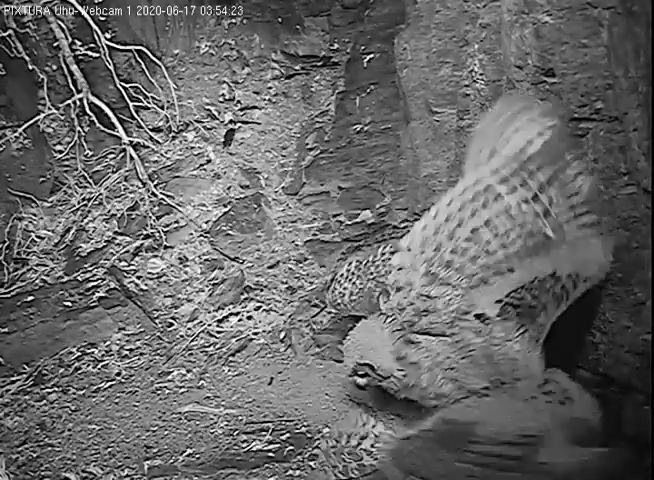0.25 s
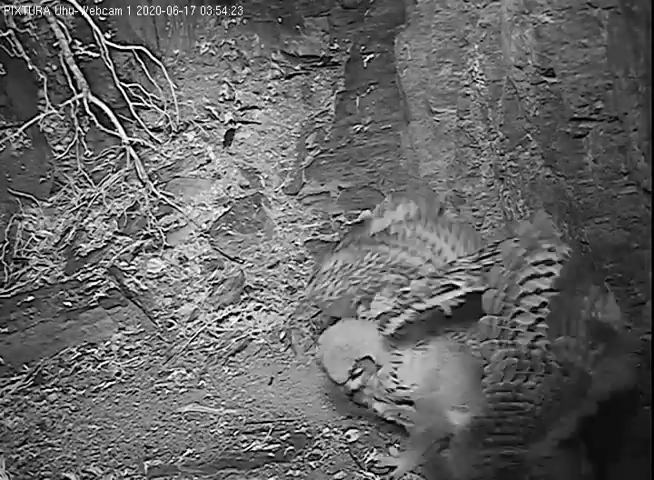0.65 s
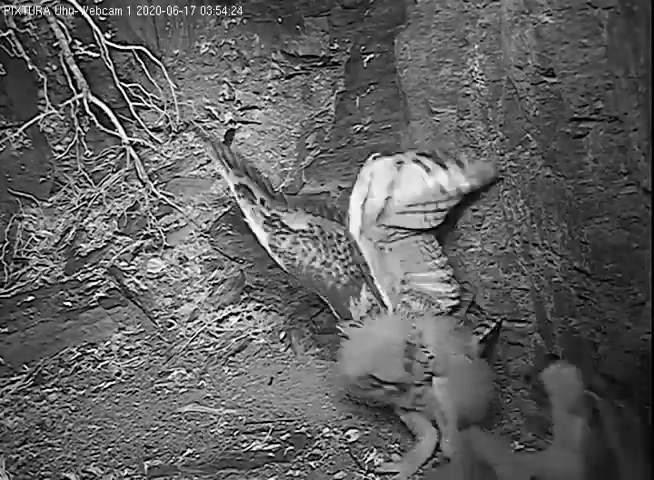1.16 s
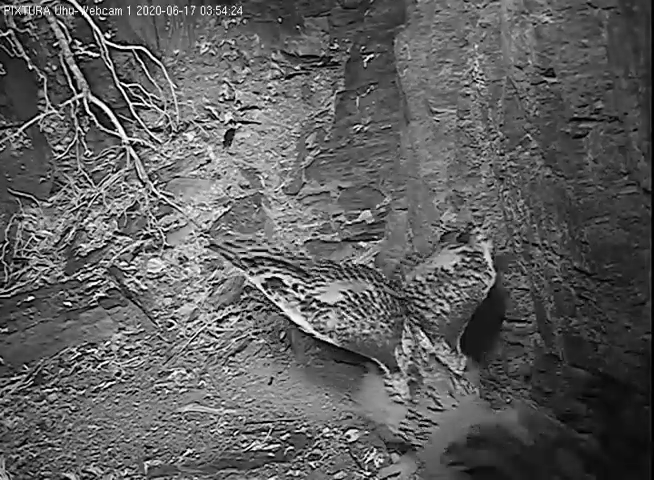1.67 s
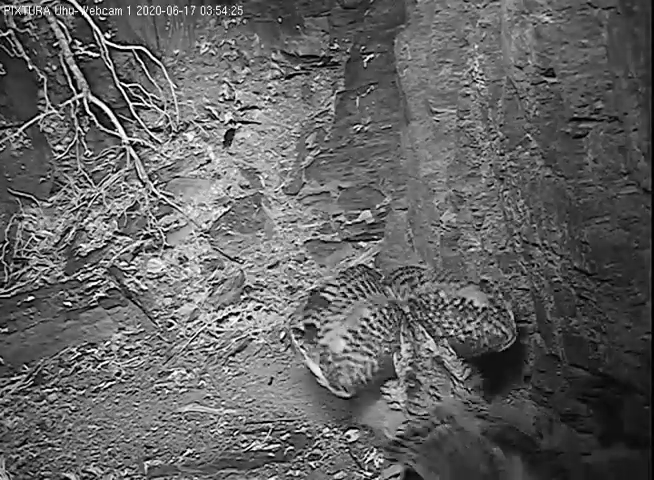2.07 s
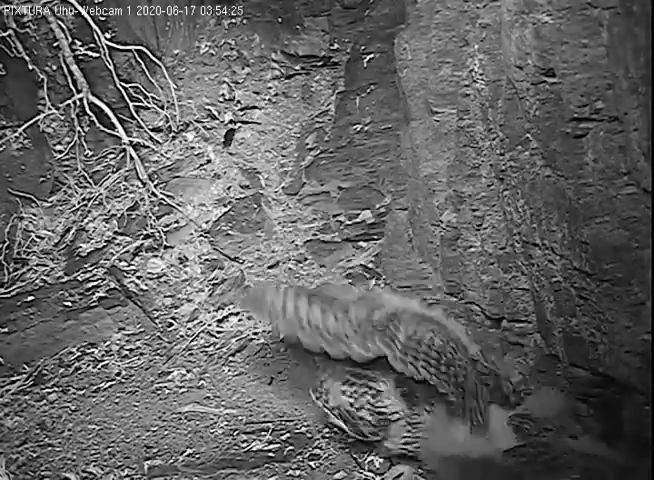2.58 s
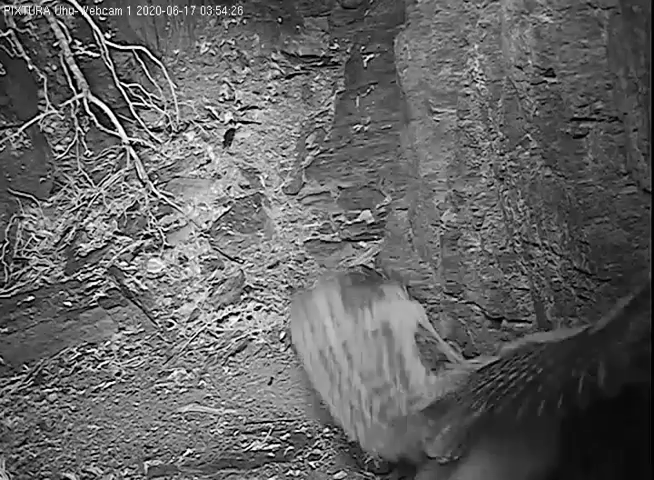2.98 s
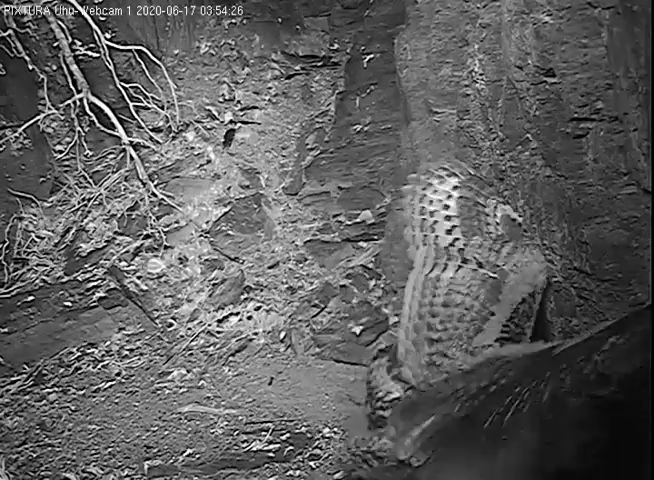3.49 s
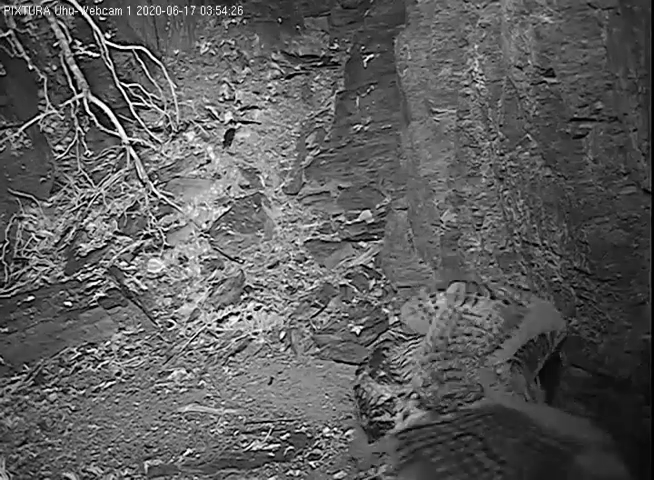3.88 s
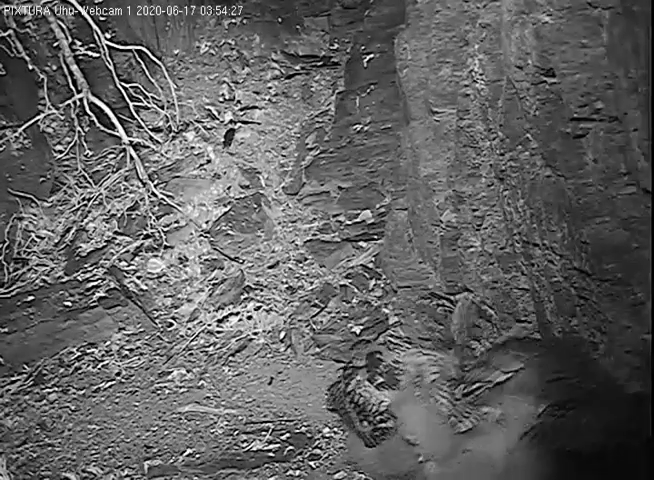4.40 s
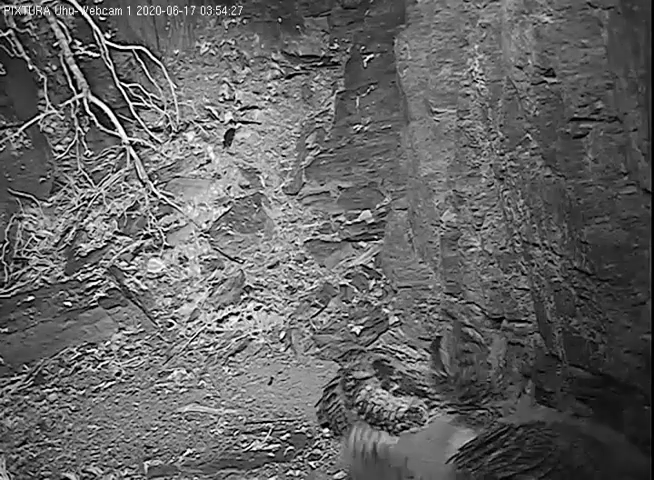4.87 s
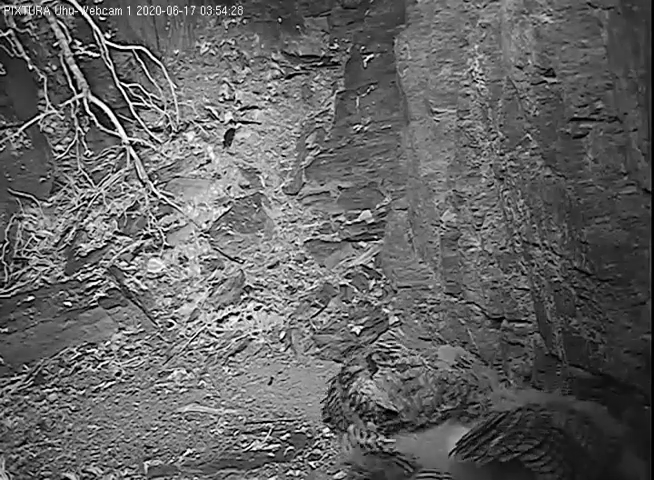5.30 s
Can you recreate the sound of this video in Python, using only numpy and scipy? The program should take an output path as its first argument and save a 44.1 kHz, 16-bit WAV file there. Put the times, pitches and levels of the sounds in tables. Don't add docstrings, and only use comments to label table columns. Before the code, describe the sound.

A young owl in a rocky nest gives thin whistles and rasping begging screeches over low rumble, after wing scuffs and one hollow knock.

```python
import sys
import numpy as np
from scipy import signal
from scipy.fft import rfft, irfft
from scipy.io import wavfile
from scipy.ndimage import uniform_filter1d

SR = 44100
rng = np.random.default_rng(int(sys.argv[2]) if len(sys.argv) > 2 else 0)


def to_linear_factor(level_db):
    exponent = np.asarray(level_db, float) / 20
    return 10 ** exponent


def to_wav(sig):
    pcm = np.clip(np.atleast_2d(sig), -1, 1) * 32767
    pcm = np.round(pcm).astype(np.int16)
    wavfile.write(sys.argv[1], SR, pcm.T)


N = 244314

# t/s, rumble level/dB, rustle level/dB
NIGHT_LEVELS = [(0.0, -42.5, -52.5), (0.12, -42, -55.5), (0.65, -41.5, -53.5), (1.5, -42, -60),
                (2.52, -39, -57), (2.75, -35.5, -58.5), (2.85, -40, -59.5), (3.02, -38, -59),
                (3.1, -43, -57), (3.35, -37.5, -58.5), (3.58, -41.5, -60.5), (3.66, -36, -58),
                (3.96, -38.5, -56), (4.1, -34.5, -53.5), (4.32, -40, -58), (4.41, -35, -57.5),
                (4.52, -39.5, -58), (4.88, -37.5, -57), (5.25, -41, -53.5), (5.54, -39.5, -56)]
# f/Hz, level/dB
RUMBLE_SPECTRUM = [(12, -39), (20, -22.5), (48, -1), (79, 4), (118, -3), (161, -1.5), (192, -6.5),
                   (226, -20), (278, -16), (320, -21.5), (420, -39), (700, -120)]
RUSTLE_SPECTRUM = [(120, -28.5), (200, -3), (227, -12), (264, -15), (430, -8), (475, -10), (525, -14.5),
                   (765, -17.5), (1010, -29.5), (1560, -24), (2060, -32.5), (2390, -25), (4000, -43),
                   (5200, -65.5), (8800, -120)]
HISS_SPECTRUM = [(530, -30), (900, -2.5), (1190, -6.5), (1560, -15.5), (1890, -6), (2460, -19.5),
                 (2890, -12), (3810, -13.5), (4230, -14.5), (6870, -14.5), (8710, -31.5), (11300, -58),
                 (19200, -120)]
# t/s, level/dB, centre f/Hz, width/octaves, t60/s
LITTER_SCUFFS = [(.276, -38, 425, 0.33, .05), (.278, -48.5, 2500, 0.62, 0.034),
                 (.308, -39, 250, 0.47, 0.055), (.317, -41, 1560, 0.42, .07),
                 (.385, -50.5, 1500, 0.98, 0.15), (.415, -47, 1390, 0.55, 0.088),
                 (.607, -42.5, 2670, 0.83, .12), (.609, -46, 470, 0.21, 0.091),
                 (.832, -45.5, 500, 1.2, 0.056), (.846, -52, 3520, 0.69, .1),
                 (1.075, -48.5, 4950, 0.4, 0.072), (1.098, -50, 1200, .9, 0.043),
                 (2.209, -49, 594, .8, 0.094), (2.750, -46, 440, 0.51, 0.11),
                 (2.787, -41.5, 336, 1.18, 0.14), (2.856, -54, 500, 0.37, 0.041),
                 (3.286, -39, 567, 0.72, 0.067), (4.005, -53, 600, .8, .08), (4.170, -51, 500, 0.88, 0.23),
                 (5.340, -48, 810, 1.1, 0.24)]
# t/s, level/dB, contact/ms
KNOCK_BLOWS = [
    (0.489, -20.5, .9),
    (0.49, -20.5, 0.22),
    (.4940, -25, 0.15),
    (.4975, -23, 0.24),
]
# f/Hz, level/dB, t60/s
BODY_MODES = [(414, -24, .03), (530, -1, 0.045), (657, 5.5, 0.031), (790, -19, 0.017), (950, -7, 0.045),
              (1176, -1.5, 0.058), (1480, 8.5, 0.045), (1550, -7, 0.054), (2000, 2, 0.033),
              (2500, -31, 0.023)]
# t/s, length/s, start f/Hz, end f/Hz, level/dB, octave level/dB
WHISTLE_GLIDES = [(0.529, 0.017, 5250, 5250, -58.5, -30), (0.622, 0.026, 5300, 5330, -55, -30),
                  (0.647, 0.022, 2450, 2500, -53, -25), (0.677, .015, 2560, 2760, -54, -21),
                  (0.871, .03, 2450, 2380, -59, -14), (0.914, 0.018, 1536, 1550, -53.5, -15),
                  (1.016, 0.012, 5200, 5200, -57, -30), (1.15, 0.033, 2262, 2234, -40.5, -25),
                  (1.194, 0.019, 2350, 2910, -39, -15.5), (1.274, .016, 2300, 2220, -48, -24),
                  (1.305, 0.012, 2320, 2500, -46.5, -12), (1.693, 0.017, 2130, 2760, -43.5, -15),
                  (1.702, 0.07, 3086, 3100, -44.5, -28), (1.753, 0.021, 3300, 2430, -34.5, -33),
                  (1.782, 0.016, 2390, 3300, -40, -17), (1.859, 0.013, 3700, 2710, -31, -27),
                  (1.88, 0.019, 2690, 3530, -40.5, -18), (1.942, 0.01, 3800, 3170, -32.5, -25),
                  (2.008, 0.01, 2870, 2970, -43, -20), (1.925, .014, 3100, 3180, -50, -15),
                  (2.106, 0.011, 3880, 3830, -47, -20), (2.133, 0.0097, 2580, 2950, -32, -29),
                  (2.192, .014, 4770, 4700, -47, -20), (2.318, 0.023, 4200, 4360, -48, -18),
                  (2.905, 0.013, 4430, 4740, -34.5, -24), (2.009, 0.029, 4200, 4130, -42, -38),
                  (2.161, 0.027, 2700, 2900, -51, -16), (2.274, 0.011, 4200, 4170, -46.5, -25),
                  (2.486, .018, 3800, 3756, -33, -25), (2.506, .03, 3860, 3800, -51, -32),
                  (2.484, .055, 5130, 4850, -44, -30), (2.579, 0.016, 5130, 5400, -46, -30),
                  (2.597, 0.039, 5200, 4820, -42, -30), (2.672, 0.022, 5200, 6000, -48.5, -35),
                  (2.689, 0.048, 5440, 4500, -42.5, -35), (2.723, 0.018, 1500, 1480, -43.5, -28),
                  (2.765, 0.029, 3950, 5430, -43.5, -30), (2.794, 0.039, 4860, 4560, -44, -25),
                  (2.876, 0.017, 4830, 4290, -24.5, -30), (3.500, .012, 2070, 2640, -39.5, -25),
                  (3.51, 0.062, 3230, 3110, -53, -10), (3.551, 0.026, 3010, 2920, -39, -10.5),
                  (3.571, 0.026, 2850, 2230, -38.5, -24), (3.613, 0.032, 2500, 3140, -41.5, -21),
                  (3.643, 0.032, 2730, 2660, -45, -21), (3.664, 0.039, 2630, 2336, -39.5, -18.5),
                  (3.723, 0.018, 3075, 3350, -43, -24), (3.764, 0.025, 3310, 2626, -34.5, -15),
                  (3.804, 0.03, 2210, 2190, -49, -11), (3.828, 0.015, 3210, 3360, -45.5, -22),
                  (3.858, 0.018, 3364, 3020, -35.5, -29), (3.945, 0.042, 3310, 2530, -38.5, -22),
                  (4.05, 0.0224, 3250, 2400, -40, -22), (4.096, 0.025, 2920, 3340, -40, -26),
                  (4.13, 0.033, 3270, 2350, -39, -27), (4.496, .014, 2000, 2320, -56, -20),
                  (4.514, 0.032, 2500, 2280, -51.5, -17), (4.548, .02, 2090, 2040, -53, -22),
                  (4.582, .035, 1920, 1920, -57.5, -21), (4.624, 0.03, 2070, 1980, -53, -16),
                  (4.670, 0.043, 1930, 1770, -54.5, -20), (4.73, .045, 2050, 2193, -55, -9.5),
                  (4.784, .02, 2160, 2980, -44, -10), (4.805, 0.014, 2950, 2920, -48, -12),
                  (4.818, 0.034, 2863, 2620, -38, -18.5), (4.839, 0.028, 2765, 2220, -41, -16),
                  (4.878, 0.026, 2230, 2900, -41.5, -11.5), (4.887, 0.064, 3230, 3244, -41.5, -22),
                  (4.894, 0.073, 2780, 2996, -37.5, -19.5), (4.963, 0.012, 2800, 3400, -35.5, -20),
                  (5.016, 0.032, 3285, 2750, -34, -17), (5.110, 0.016, 3540, 2520, -36.5, -15),
                  (5.14, 0.021, 2660, 3510, -39.5, -19), (5.19, 0.036, 3315, 2600, -32.5, -18),
                  (5.238, 0.052, 3290, 3190, -45.5, -15), (5.287, 0.019, 3370, 2610, -33, -17.5)]
# t/s, f/Hz, level/dB
ARCHED_WHISTLE = [
    (1.485, 2389, -73),
    (1.515, 2786, -47),
    (1.567, 3228, -50.5),
    (1.665, 2750, -50.5),
    (1.673, 2771, -75),
    (1.685, 2352, -71),
]
# t/s, level/dB
BEAK_AIR = [
    [(1.68, -84), (1.696, -70), (2.036, -55), (2.188, -70), (2.196, -51), (2.24, -63), (2.328, -58),
     (2.352, -83), (2.368, -54), (2.802, -49.5), (2.826, -36), (2.862, -71), (2.882, -38), (2.942, -63),
     (2.962, -40), (3.018, -66), (3.07, -41), (3.12, -74)],
    [(3.45, -81), (3.58, -66), (3.766, -70), (3.786, -56), (3.866, -65), (3.904, -57), (3.94, -63),
     (3.99, -60), (4.026, -73), (4.194, -65), (4.25, -84)],
    [(4.72, -82), (4.728, -79), (4.8, -62), (4.81, -71), (4.842, -59), (4.862, -67), (5.07, -55),
     (5.076, -57), (5.304, -54), (5.362, -54), (5.42, -83)],
]
# t/s, length/s, start f/Hz, dip f/Hz, end f/Hz, level/dB
RASP_DIPS = [(1.707, .1, 3000, 2855, 3080, -51), (1.85, .055, 3680, 2500, 3440, -44),
             (1.94, .05, 3900, 2630, 3100, -41.5), (2.021, 0.049, 3900, 2500, 3200, -39.5),
             (2.104, 0.046, 3890, 2585, 3800, -39.5), (2.197, 0.045, 3800, 2500, 3100, -34.5),
             (2.282, .05, 3900, 2624, 3150, -35), (2.364, 0.066, 4140, 2880, 4120, -38),
             (2.446, .055, 3900, 2900, 3800, -40), (2.53, .065, 3800, 3000, 3640, -36.5),
             (2.622, .055, 4500, 3115, 4200, -37.5), (2.7, .065, 4300, 3530, 3980, -41.5),
             (2.787, .055, 4200, 3650, 4470, -37), (2.867, 0.064, 4800, 3610, 4400, -41.5),
             (2.953, .05, 4400, 2350, 3400, -34), (3.037, 0.052, 3700, 2680, 2450, -31.5),
             (3.043, 0.061, 1750, 1578, 1100, -40.5), (3.457, 0.079, 2300, 1777, 2580, -48),
             (3.564, 0.098, 3000, 2500, 3060, -50), (3.696, 0.049, 2690, 2400, 3200, -43),
             (3.784, 0.061, 2850, 2432, 3220, -42), (3.868, 0.058, 3220, 2500, 2780, -42.5),
             (3.975, .045, 2753, 2460, 3160, -40.5), (4.059, 0.0447, 2940, 2235, 2920, -44),
             (4.154, 0.073, 2910, 2190, 2300, -43.5), (4.792, 0.025, 2710, 2860, 2940, -47.5),
             (4.942, 0.029, 2880, 2390, 3010, -43.5), (4.98, .032, 3090, 3000, 3040, -45),
             (5.027, 0.052, 2920, 2320, 3440, -42), (5.118, 0.032, 2820, 2380, 3130, -45),
             (5.221, 0.0387, 2770, 2280, 3030, -44.5), (5.305, 0.041, 2890, 2500, 2800, -40.5),
             (5.325, 0.066, 3000, 2610, 2500, -35.5)]
# f/Hz, level/dB
RASP_AIR_SPECTRUM = [(900, -6), (1500, 7), (2500, 4.5), (4000, 7.5), (5200, 6.5), (6000, -8.5),
                     (7500, -5.5), (9000, -37)]
# f/Hz, width/Hz, gain/dB
THROAT_RESONANCES = [(2450, 86, 5), (3250, 330, 5), (3800, 470, 5.5), (4200, 67, 3.5), (5200, 190, 1)]
# delay/s, level/dB
ROCK_ECHOES = [
    (.0031, -14),
    (.0057, -13),
    (.0094, -15),
    (0.0139, -15.5),
]


def evened(x):
    return x / np.sqrt(np.mean(x ** 2) + 1e-20)


def read(points, hz):
    f, level_db = np.transpose(points)
    return np.interp(np.log(hz + 1), np.log(f + 1), level_db, -90, -90)


def colour(x, shape_db):
    hz = np.fft.rfftfreq(len(x), 1 / SR)
    return irfft(rfft(x) * to_linear_factor(shape_db(hz)), len(x))


def bell_db(hz, centre_hz, octaves):
    return -6 * (np.log2((hz + 1) / centre_hz) / octaves) ** 2


def drift(size, hz):
    return evened(colour(rng.standard_normal(size), lambda f: -20 * (f / hz) ** 2))


def add(mix, s, sound):
    part = mix[round(s * SR):][:len(sound)]
    part += sound[:len(part)]


def night():
    s, rumble_db, rustle_db = np.transpose(NIGHT_LEVELS)
    t = np.arange(N) / SR
    low, grains, smooth = rng.standard_normal((3, N))
    grains = grains * to_linear_factor(1.3 * drift(N, 25))
    rumble = evened(colour(low, lambda f: read(RUMBLE_SPECTRUM, f)))
    rustle = evened(colour(grains, lambda f: read(RUSTLE_SPECTRUM, f)))
    hiss = evened(colour(smooth, lambda f: read(HISS_SPECTRUM, f)))
    out = to_linear_factor(np.interp(t, s, rumble_db)) * rumble
    out += to_linear_factor(np.interp(t, s, rustle_db) + 3.5) * rustle
    return out + to_linear_factor(-62) * hiss


def scuffs():
    size, rise_s = 8192, 0.0016
    out, t = np.zeros(N), np.arange(size) / SR
    for s, db, centre_hz, octaves, t60_s in LITTER_SCUFFS:
        noise, grit = rng.standard_normal((2, size))
        burst = noise * to_linear_factor(1.0 * evened(uniform_filter1d(grit, 60)))
        burst = evened(colour(burst, lambda f: bell_db(f, centre_hz, octaves)))
        add(out, s, to_linear_factor(db - 60 * t / t60_s) * burst * np.minimum(t / rise_s, 1))
    return out


def knock():
    out, t = np.zeros(N), np.arange(4096) / SR
    ring = np.zeros(len(t))
    for hz, db, t60_s in BODY_MODES:
        ring -= to_linear_factor(db - 60 * t / t60_s) * np.sin(2 * np.pi * hz * t)
    for s, db, contact_ms in KNOCK_BLOWS:
        contact = np.hanning(round(contact_ms * SR / 1000) + 3)
        blow = np.convolve(ring, contact)
        add(out, s, to_linear_factor(db) * blow / abs(blow).max())
    return out


def tone(hz, octave_db):
    phase = 2 * np.pi * np.cumsum(hz) / SR
    throat_loss_db = 24 * np.maximum(hz / 2800 - 1, 0) / 0.23
    return np.sqrt(2) * (np.sin(phase) + to_linear_factor(octave_db - throat_loss_db) * np.sin(2 * phase))


def whistles():
    out = np.zeros(N)
    waver, flutter, hoarse = drift(N, 270), drift(N, 82), drift(N, 780)
    for s, length_s, start_hz, end_hz, db, octave_db in WHISTLE_GLIDES:
        n, at = round(length_s * SR), round(s * SR)
        hz = np.linspace(start_hz, end_hz, n) * (1 + .009 * waver[at:at + n])
        add(out, s, to_linear_factor(db) * tone(hz, octave_db) * signal.windows.tukey(n, .55))
    s, hz, db = np.transpose(ARCHED_WHISTLE)
    t = np.arange(s[0], s[-1], 1 / SR)
    arch = tone(np.interp(t, s, hz), -28) * signal.windows.tukey(len(t), .1)
    add(out, s[0], to_linear_factor(np.interp(t, s, db)) * arch)
    return out * to_linear_factor(1.5 * flutter) * (1 + .25 * hoarse)


def beak():
    t, level = np.arange(N) / SR, np.zeros(N)
    for phrase in BEAK_AIR:
        s, db = np.transpose(phrase)
        level += to_linear_factor(np.interp(t, s, db, -120, -120) - 2.5)

    def resonances_db(f):
        upper = -6 * ((f - 5200) / 550) ** 2
        lower = -1.5 - 6 * ((f - 3050) / 450) ** 2
        return np.maximum(upper, lower)

    air = evened(colour(rng.standard_normal(N), resonances_db))
    return level * air * to_linear_factor(1.9 * drift(N, 60))


def rasps():
    out = np.zeros(N)
    jump, sputter = np.tanh(drift(N, 700)), np.tanh(drift(N, 220))
    air = evened(colour(rng.standard_normal(N), lambda f: read(RASP_AIR_SPECTRUM, f)))
    fizz = evened(colour(rng.standard_normal(N), lambda f: bell_db(f, 6800, 0.18)))
    for s, length_s, start_hz, dip_hz, end_hz, db in RASP_DIPS:
        n, at = round(length_s * SR), round(s * SR)
        here = slice(at, at + n)
        u = np.linspace(0, 1, n)
        chaos = .07 + .12 * np.sin(np.pi * u) ** 2
        hz = np.interp(u, [0, .3, .6, 1], [start_hz, dip_hz, 1.05 * dip_hz, end_hz])
        hz = hz * (1 + chaos * jump[here])
        fizz_db = -26 + 14 * (start_hz / 4000 - 1) / 0.16
        voice = tone(hz, -23) + to_linear_factor(-11.5) * air[here] + to_linear_factor(fizz_db) * fizz[here]
        add(out, s, to_linear_factor(db) * voice * signal.windows.tukey(n, .7))
        leak = to_linear_factor(db - 15.5) * air[here] * signal.windows.tukey(n, .5)
        add(out, s - .012, leak)
    return out * to_linear_factor(6 * sputter)


def throat_db(f):
    peaks = sum(db / (1 + (2 * (f - hz) / width_hz) ** 2) for hz, width_hz, db in THROAT_RESONANCES)
    return peaks - 6.5


def rock_nest(voice):
    t60_s = .1
    t = np.arange(SR // 4) / SR
    nest = to_linear_factor(-8) * evened(rng.standard_normal(len(t))) * to_linear_factor(-60 * t / t60_s)
    nest *= np.sqrt(2 * np.log(1000) / (t60_s * SR)) * (t > .004)
    nest[0] = 1
    for s, db in ROCK_ECHOES:
        add(nest, s, to_linear_factor(db) * np.ones(1))
    return signal.fftconvolve(voice, nest / np.linalg.norm(nest))[:N]


def owlet():
    return rock_nest(colour(whistles() + beak() + rasps(), throat_db))


def scene():
    return (night() + scuffs() + knock() + owlet())[None]


def low_pass(x):
    return signal.sosfilt(signal.butter(12, 8860, fs=SR, output="sos"), x)


def record(dry):
    lowpass = signal.firwin(401, 8690, window=("kaiser", 9), fs=SR)
    narrow = signal.oaconvolve(dry, lowpass[None], "same")
    return low_pass(narrow)


dry = scene()
out = record(dry)
to_wav(out)
```